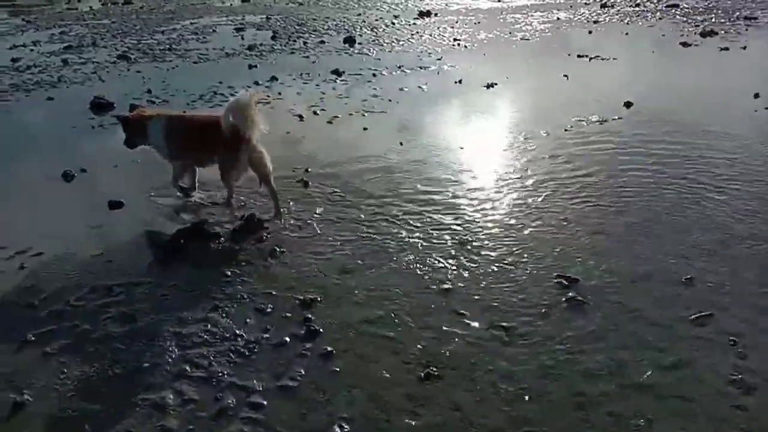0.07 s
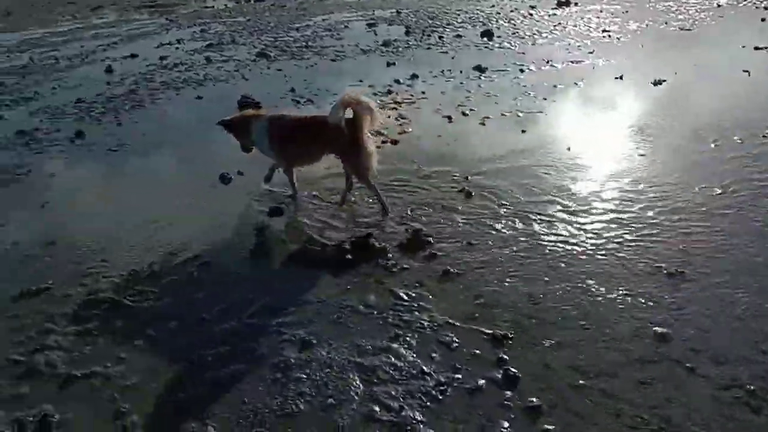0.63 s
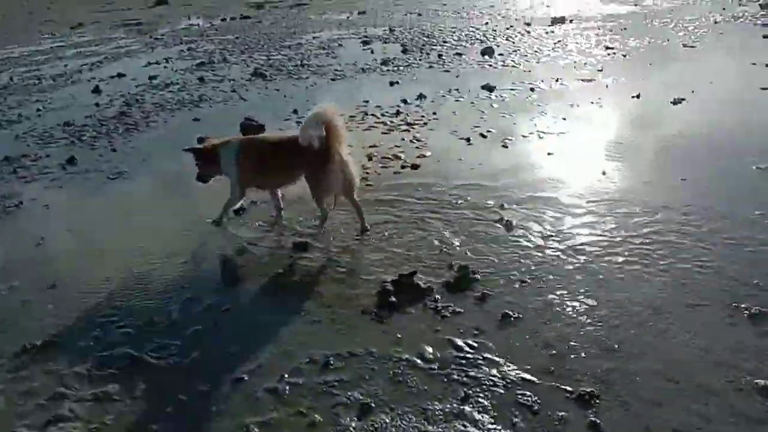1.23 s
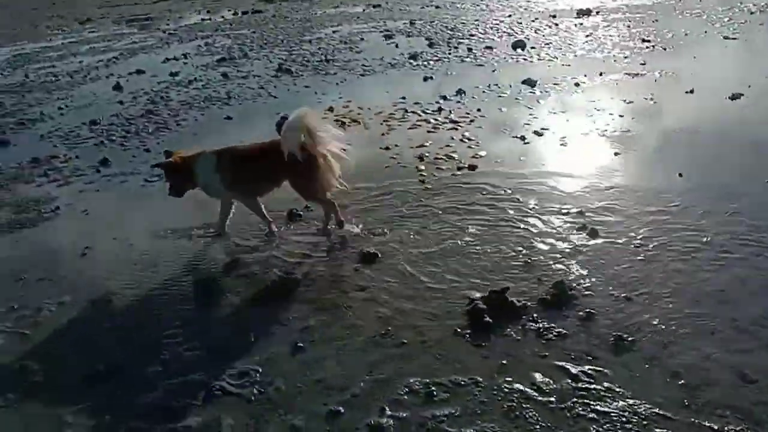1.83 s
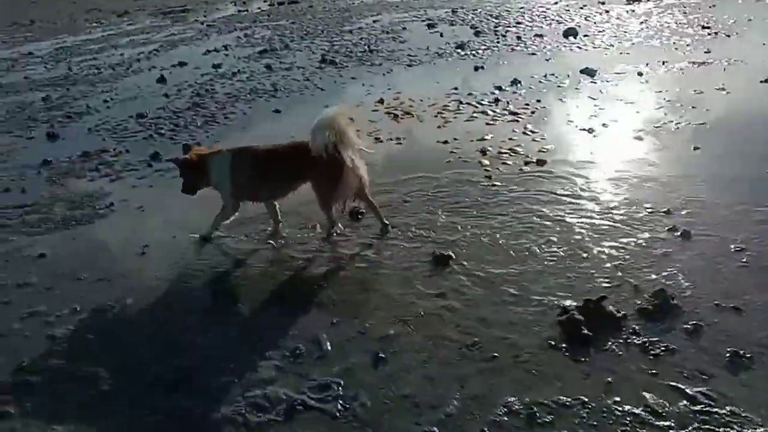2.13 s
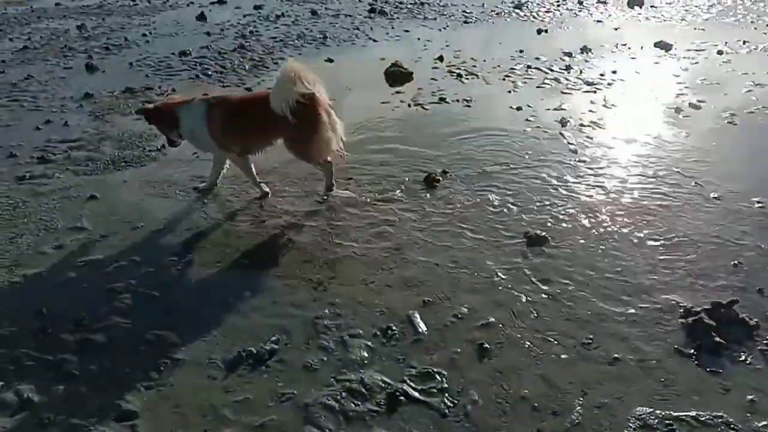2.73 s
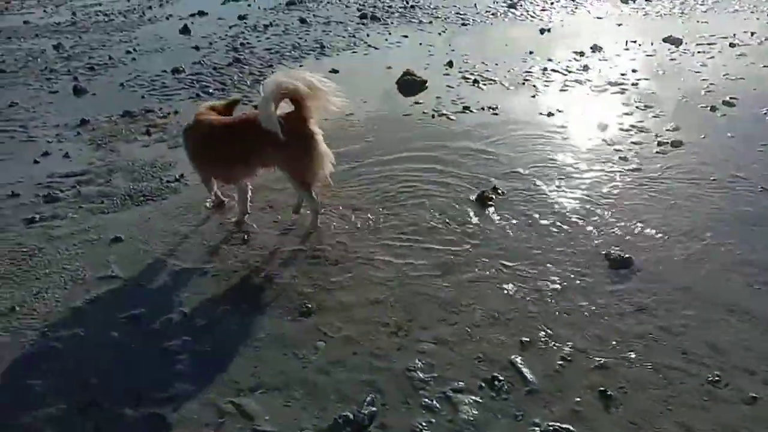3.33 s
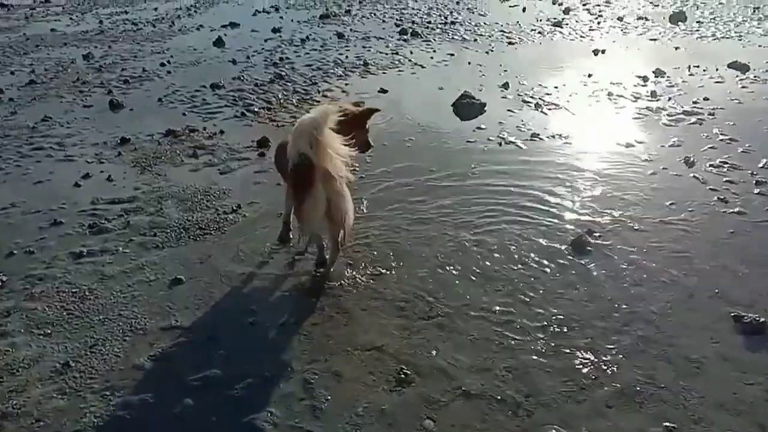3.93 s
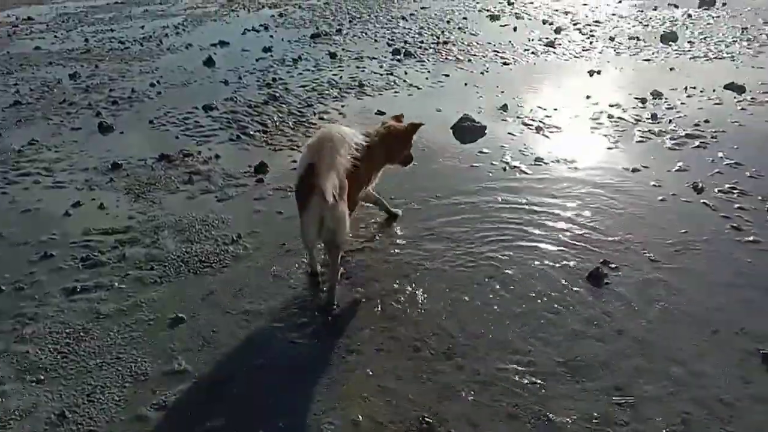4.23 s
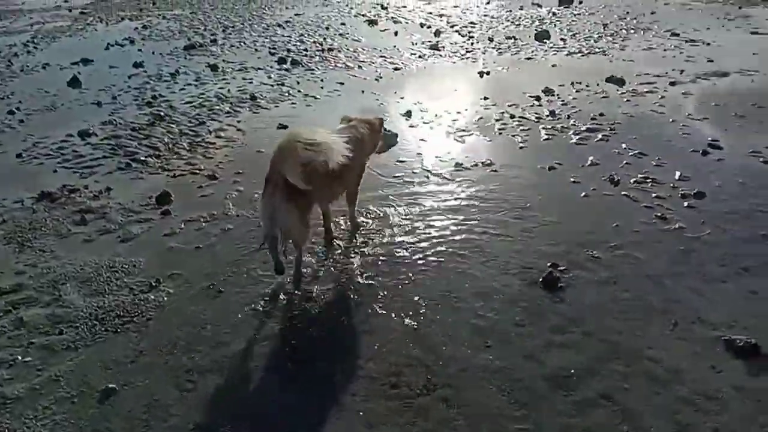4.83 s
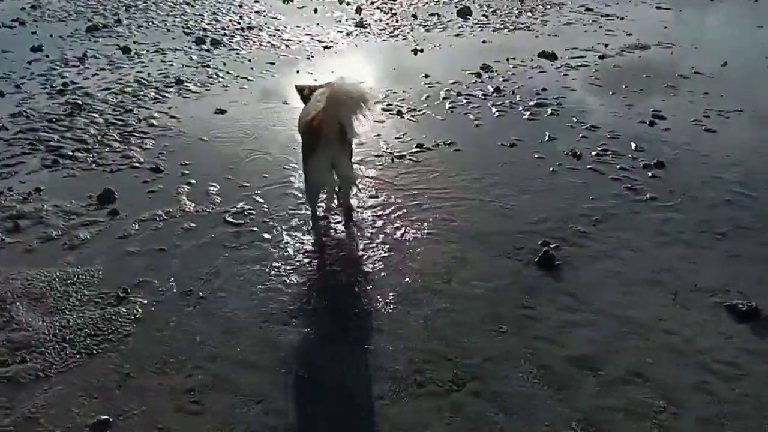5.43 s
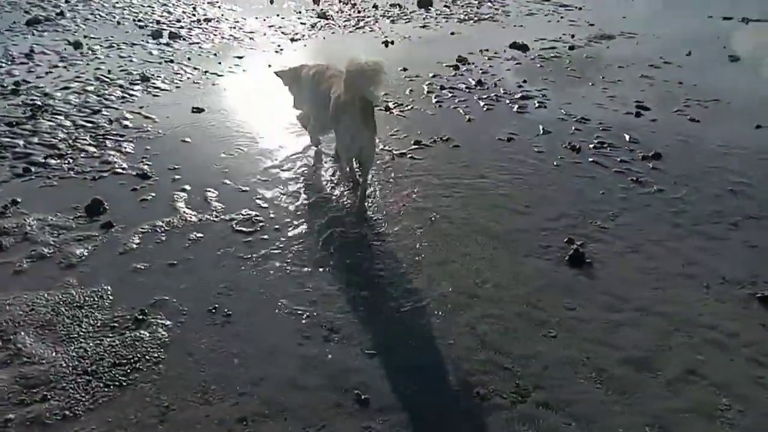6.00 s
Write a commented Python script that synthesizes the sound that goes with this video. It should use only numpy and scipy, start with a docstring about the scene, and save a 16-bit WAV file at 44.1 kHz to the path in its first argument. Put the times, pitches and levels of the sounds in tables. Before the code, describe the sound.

Gusty wind rumbles on the microphone, growing louder and steadier halfway, as a wading dog's small splashes and drips become fainter.

```python
"""A dog wades through a film of water on a tidal flat. From the start its paws slap, squelch and drag
up spray, leaving drips and ringing bubbles, while wind hits the microphone in separate puffs.
After a lull, one paw traps a big bubble that plops near 3 s. The wind then swells twice into a steady
rumble, held down by a limiter, and the steps grow fainter.
A faint hiss with one narrow resonance lies under it all."""
import sys
import numpy as np
from scipy import signal
from scipy.fft import rfft, irfft, next_fast_len
from scipy.io import wavfile
from scipy.ndimage import uniform_filter1d, minimum_filter1d, map_coordinates

SR = 44100
rng = np.random.default_rng(int(sys.argv[2]) if len(sys.argv) > 2 else 0)


def transcribe(u):
    """Save the signal u as a 16-bit wav file named by the first command-line argument.

    u: samples, shape (n,) or (channels, n), limited to [-1, 1]; the rate is SR.
    q: integer samples, one column per channel.
    """
    v = np.clip(np.atleast_2d(u).T, -1, 1)
    q = np.round(v * 32767).astype(np.int16)
    wavfile.write(sys.argv[1], SR, q)


N = 267466


def amp(db):
    return 10 ** (np.asarray(db) / 20)


def unit_rms(x):
    return x / np.sqrt(np.mean(x ** 2) + 1e-20)


def noise(size):
    return rng.standard_normal(size)


def wobble(rate_hz):
    """Smooth random curve, rate_hz knots a second."""
    return map_coordinates(noise(N // 20), [np.arange(N) * rate_hz / SR], mode="wrap")


def filtered(x, response):
    """Zero-phase filter with gain response(hz)."""
    size = next_fast_len(N + 8192)
    return irfft(rfft(x, size) * response(np.fft.rfftfreq(size, 1 / SR)), size)[:N]


def coloured(x, spectrum):
    """Shape x by (frequency [Hz], gain [dB]) points; rms 1."""
    knots_hz, db = np.transpose(spectrum)
    return unit_rms(filtered(x, lambda hz: amp(np.interp(np.log(hz + 1), np.log(knots_hz), db))))


def even(x, window_s):
    """Level out swells slower than window_s."""
    size = max(3, int(window_s * SR))
    power = uniform_filter1d(uniform_filter1d(x * x, size), size)
    return x / np.sqrt(np.abs(power) + 1e-6)


def band(x, lo_hz, hi_hz):
    edges_hz = [lo_hz, min(hi_hz, .49 * SR)]
    return signal.sosfilt(signal.butter(2, edges_hz, "band", fs=SR, output="sos"), x)


def add(track, start_s, sound):
    part = track[max(0, round(start_s * SR)):][:len(sound)]
    part += sound[:len(part)]


def bubble(t, hz, cycles, rise):
    """Damped ring, down to 1/e after cycles; the pitch climbs as the bubble nears the surface."""
    age = t * hz / cycles
    return np.sin(2 * np.pi * hz * t * (1 + rise * age / 2)) * np.exp(-age) * (1 - np.exp(-t * hz))


def bubble_cloud(count, lo_hz, hi_hz, cycles, rise, spread_db, samples):
    """Small bubbles of random time, pitch, life and strength."""
    when, pitch, life, strength = rng.random((count, 4)).T[:, :, None]
    k = np.arange(samples)
    rings = bubble(k / SR, lo_hz * (hi_hz / lo_hz) ** pitch, cycles * (.5 + life), rise)
    rings *= amp(-spread_db * np.log(1 - .99 * strength))
    positions = (when * N).astype(int) + k
    return np.bincount(positions.ravel(), rings.ravel(), N)[:N]


def leg_push(age_s, length_s, attack_s=0.012, sag_db_per_s=30, release_db_per_s=329.5):
    """A leg's push builds fast and sags; then the water settles."""
    fall_db = sag_db_per_s * np.maximum(age_s, 0) + release_db_per_s * np.maximum(age_s - length_s, 0)
    return np.clip(age_s / attack_s + .5, 0, 1) * amp(-fall_db)


# Legs sweeping through water: (start [s], length [s], slosh [dB], spray [dB])
LEG_SWEEPS = [(0, 0.048, -46.5, -54), (0.169, 0.044, -56, -64), (0.248, 0.016, -44.5, -51),
              (0.3, 0.11, -49.5, -55.5), (0.486, 0.06, -56, -64.5), (0.892, 0.027, -57.5, -50.5),
              (0.968, 0.15, -67.5, -72.5), (1.134, 0.057, -54, -62.5), (1.203, 0.06, -51.5, -52),
              (1.325, 0.012, -59.5, -61.5), (1.487, 0.11, -62, -69.5), (1.591, 0.077, -57.5, -56.5),
              (1.643, 0.032, -50, -50), (1.676, 0.075, -50, -54), (1.937, 0.2, -52, -58),
              (2.14, 0.26, -65, -89), (2.321, 0.18, -53.5, -67.5), (2.524, 0.061, -61, -58),
              (2.569, 0.13, -52, -57), (2.795, 0.24, -58.5, -61.5), (2.95, 0.087, -52, -53.5),
              (3.25, 0.011, -58.5, -58.5), (3.38, 0.12, -52.5, -58), (3.67, 0.042, -59.5, -67),
              (3.771, 0.0067, -64, -61.5), (4.059, 0.012, -64.5, -72), (4.384, 0.046, -52.5, -61),
              (4.445, 0.037, -57, -62), (4.529, 0.07, -59.5, -65), (4.645, .025, -67, -67.5),
              (4.698, 0.0092, -65, -66.5), (4.731, 0.016, -62.5, -70.5), (4.923, 0.11, -69.5, -83),
              (5.19, 0.0099, -76.5, -60.5), (5.318, 0.056, -61, -68.5), (5.63, 0.031, -60, -64),
              (5.935, 0.0052, -83, -65.5)]
# Churned water, spray, settling water: (frequency [Hz], gain [dB])
CHURN_SPECTRUM = [(400, -16.5), (800, -24), (1300, 3), (1600, -1.5), (2000, 1.5), (2600, 1.5), (3500, 5),
                  (4700, -3), (6000, -3), (9000, -40)]
SPRAY_SPECTRUM = [(2500, -15.5), (4000, -12.5), (5200, -2), (6000, -19.5), (7000, -6), (9300, -1),
                  (11500, -10.5), (13700, -13), (15000, -13), (16000, 7.5)]
WASH_SPECTRUM = [(350, -13), (600, 0.5), (1000, -0.5), (1800, 0), (3000, -9.5), (5000, -23.5)]


def wading(trickle_db=-69, fade_db_per_s=1.24, clump_db=2.0, wash_db=-10, settle_s=0.13):
    """Legs churn a crackling slosh and throw spray that spatters and drips; a dull wash lingers."""
    t = np.arange(N) / SR
    slosh = amp(trickle_db - fade_db_per_s * t)  # run-off from the legs, fading as the dog walks on
    spray = slosh * amp(-12)
    for start_s, length_s, slosh_db, spray_db in LEG_SWEEPS:
        push = leg_push(t - start_s, length_s)
        slosh = np.hypot(slosh, amp(slosh_db) * push)
        spray = np.hypot(spray, amp(spray_db) * push)
    churn = bubble_cloud(11000, 900, 6500, cycles=3.2, rise=.002, spread_db=3.9, samples=450)
    drops = bubble_cloud(10000, 4000, 16000, cycles=3.6, rise=.002, spread_db=4.4, samples=200)
    clicks = bubble_cloud(1700, 2500, 9000, cycles=.5, rise=0, spread_db=4.5, samples=100)
    plinks = bubble_cloud(700, 2400, 9500, cycles=14, rise=.003, spread_db=3, samples=1500)
    churn = even(coloured(unit_rms(churn) + 0.65 * noise(N), CHURN_SPECTRUM), window_s=.05)
    drops = even(coloured(unit_rms(drops) + 0.16 * noise(N), SPRAY_SPECTRUM), window_s=.07)
    crackle = amp(-12) * even(unit_rms(band(clicks, 1600, 5000)), window_s=.06)
    spatter = amp(-11) * even(unit_rms(band(clicks, 6000, 11500)), window_s=.06)
    clumps = amp(clump_db * wobble(110))  # water falls back in clumps
    pole = np.exp(-1 / (settle_s * SR))
    stirred = signal.lfilter([1 - pole], [1, -pole], slosh)
    wash = amp(wash_db) * stirred * coloured(noise(N), WASH_SPECTRUM)
    drips = np.minimum(slosh * amp(-9), amp(-62)) * unit_rms(plinks)
    return clumps * (slosh * churn + spray * drops + wash) + slosh * crackle + spray * spatter + drips


# Impacts on water, broad paws low, small drops high: (time [s], level [dB], pitch [Hz])
IMPACTS = [(0.026, -20.5, 1750), (0.2512, -18, 1300), (0.26, -23, 1940), (0.263, -16, 2700),
           (0.2705, -26.5, 4140), (0.346, -27.5, 3660), (0.409, -11.5, 3100), (0.4563, -34, 3870),
           (0.725, -25, 3370), (0.735, -27.5, 5100), (0.853, -27.5, 2220), (0.8978, -27, 4740),
           (0.9, -29, 3800), (1.1264, -33, 4300), (1.1511, -23.5, 1950), (1.204, -11.5, 1590),
           (1.2165, -5, 2070), (1.241, -18.5, 2940), (1.3342, -26.5, 12000), (1.5485, -26.5, 2030),
           (1.5726, -33, 4860), (1.608, -36.5, 2380), (1.66, -15.5, 3460), (1.6658, -32, 4570),
           (1.684, -39, 3200), (1.9704, -28, 3400), (2.034, -13.5, 1750), (2.0598, -26, 3650),
           (2.069, -37, 5200), (2.1596, -31, 5160), (2.3355, -27, 5740), (2.5235, -34.5, 3900),
           (2.5931, -39, 2520), (2.683, -25.5, 4150), (2.7176, -44, 2600), (2.8134, -37, 5070),
           (2.8514, -40, 6000), (2.905, -29.5, 4830), (2.969, -18.5, 2250), (2.9824, -13.5, 1740),
           (3.0662, -13.5, 2580), (3.086, -30.5, 3280), (3.1997, -37, 7000), (3.3967, -17.5, 2750),
           (3.4138, -27.5, 3340), (3.512, -20, 2883), (3.5165, -14.5, 3550), (3.711, -38.5, 5600),
           (4.241, -19, 3200), (4.3893, -28.5, 3150), (4.4574, -33.5, 3710), (4.4815, -22, 3940),
           (4.538, -32, 1300), (4.645, -36, 1800), (4.741, -38, 4000), (4.9285, -30, 1480),
           (5.0403, -34, 5040), (5.1954, -32, 3240), (5.6396, -27.5, 3270), (5.6617, -33, 2450),
           (5.938, -33.5, 5000)]
# Hollow knock, wet splat, sharp tick: (frequency [Hz], gain [dB], life [cycles])
IMPACT_MODES = [(1150, -2, 1.33), (2820, -2, 0.97), (8750, 3.5, 2.83)]


def slaps(fall_db_per_octave=15, patter_db=-25, patter_t60_s=0.041):
    """An impact rings three modes, less so far from its pitch, each with a short patter behind."""
    out, t = np.zeros(N), np.arange(SR // 12) / SR
    mode_hz, mode_db, mode_cycles = np.transpose(IMPACT_MODES)
    patter_decay = amp(patter_db - 60 * t / patter_t60_s)
    for time_s, db, pitch_hz in IMPACTS:
        detune = np.exp(rng.normal(0, 0.19))
        octaves = np.abs(np.log2(mode_hz / pitch_hz))
        gains = amp(db + mode_db - fall_db_per_octave * (octaves - octaves.min()))
        for gain, hz, cycles in zip(gains, mode_hz * detune, mode_cycles):
            patter = unit_rms(band(noise(len(t)), hz / np.sqrt(2), hz * np.sqrt(2)))
            add(out, time_s, gain * (bubble(t, hz, cycles, rise=0) + patter * patter_decay))
    return out


# Air pockets closing behind a paw, and bright drips: (time [s], level [dB], pitch [Hz])
SINGLE_BUBBLES = [(0.024, -30, 1910), (0.242, -34.5, 1800), (0.2543, -24, 1280), (0.276, -44, 2850),
                  (0.309, -35, 3420), (.319, -39, 1990), (0.329, -39, 2650), (.358, -41, 1810),
                  (0.368, -37, 2540), (0.387, -29.5, 2130), (0.409, -27, 1760), (0.514, -38.5, 4050),
                  (.569, -47, 4530), (.611, -56, 6050), (.852, -41.5, 4900), (.997, -46, 2830),
                  (1.057, -43.5, 2480), (1.166, -36, 2770), (1.18, -38, 2520), (1.201, -27, 2000),
                  (1.2036, -16, 1284), (1.215, -19, 1300), (1.227, -45, 3530), (1.242, -34, 1980),
                  (1.2767, -32, 2100), (1.307, -31, 2000), (1.319, -31, 1280), (1.322, -32.5, 3000),
                  (1.4221, -38, 2560), (1.605, -35.5, 2970), (1.662, -34, 3820), (1.683, -31.5, 3220),
                  (1.698, -29.5, 1980), (1.741, -45, 1690), (1.743, -37, 2890), (1.759, -40, 2000),
                  (1.8318, -32, 1270), (1.998, -40, 1880), (2.0346, -25.5, 1330), (2.107, -37, 1910),
                  (2.151, -35, 2240), (2.26, -45, 2800), (2.356, -40, 2840), (2.364, -38, 3420),
                  (2.414, -40.5, 2150), (2.576, -44, 1870), (2.578, -41, 3330), (2.594, -37, 2600),
                  (2.66, -42, 3880), (2.675, -36, 3860), (2.788, -44, 4100), (2.796, -39.5, 2430),
                  (2.9304, -37, 2090), (2.942, -33, 2600), (2.9538, -29, 1340), (3.261, -35.5, 2130),
                  (3.368, -45, 2730), (3.4, -32, 3430), (3.411, -32.5, 3170), (3.455, -40, 3380),
                  (3.49, -46, 2120), (3.663, -42, 2140), (3.683, -26.5, 1247), (3.785, -39.5, 2950),
                  (3.939, -56, 3840), (4.057, -46, 2650), (4.067, -44.5, 2610), (4.081, -49.5, 4540),
                  (4.162, -51, 3740), (4.2381, -41, 3000), (4.283, -48.5, 3560), (4.307, -51, 3450),
                  (4.385, -34, 3520), (4.399, -36, 3900), (4.413, -39, 3270), (4.428, -41, 1760),
                  (4.508, -45, 2690), (4.5369, -27.5, 1140), (4.578, -44, 2800), (4.588, -42, 2750),
                  (4.598, -43, 2880), (4.645, -39, 1350), (4.693, -45.5, 3700), (4.744, -42, 3660),
                  (4.7593, -45, 3620), (4.927, -26.5, 1120), (4.957, -39, 1120), (5.191, -40.5, 2520),
                  (5.63, -43.5, 2020), (5.66, -38.5, 1880), (5.661, -38, 3370), (5.715, -48.5, 3630),
                  (5.876, -53.5, 3700), (6.0047, -43.5, 2320)]


def bubbles(jostle_depth=0.13, ref_cycles=4.93, ref_hz=1260):
    """Bubbles ring and glide slightly, jostled by moving water; small ones last more cycles."""
    out, t = np.zeros(N), np.arange(SR // 20) / SR
    for time_s, db, hz in SINGLE_BUBBLES:
        jostle = 1 + jostle_depth * unit_rms(band(noise(len(t)), 150, 900))
        ring = bubble(t, hz, ref_cycles * np.sqrt(hz / ref_hz), rise=rng.normal(0.0029, 0.0033))
        add(out, time_s, amp(db) * jostle * ring)
    return out


def plop(start_s=2.982, start_hz=735, db=-20, climb_s=0.048, t60_s=0.125, burst_s=0.069):
    """A paw traps a big bubble; its note swoops up, quivering, until it bursts."""
    out, t = np.zeros(N), np.arange(SR // 10) / SR
    quiver = wobble(260)[:len(t)] * t / climb_s
    pitch_hz = start_hz * (1 + 0.53 * (t / climb_s) ** 2 + 0.061 * quiver)
    ring = np.sin(2 * np.pi * np.cumsum(pitch_hz) / SR)
    attack = 1 - np.exp(-t / 0.00026)
    decay = amp(-60 * t / t60_s + 3.5 * quiver)
    cutoff = np.clip((burst_s - t) / .006, 0, 1)
    add(out, start_s, amp(db) * ring * attack * decay * cutoff)
    return out


# Paws pressing into mud: (time [s], level [dB], t60 [s])
PAW_PRESSES = [(0.248, -32.5, 0.1), (0.324, -37.5, 0.055), (0.823, -50.5, 0.41), (1.202, -38, 0.25),
               (1.964, -50, 1), (2.034, -64, 0.2), (2.419, -46, 0.24), (2.59, -59, 0.23), (2.81, -45, 0.19),
               (3.195, -42, 0.16), (3.565, -45.5, 0.51), (4.541, -39, 0.091), (4.927, -37, 0.064),
               (4.956, -54.5, 0.98), (5.311, -37, 0.09)]
# Mud gurgle: (frequency [Hz], gain [dB])
GURGLE_SPECTRUM = [(350, -45.5), (700, -4.5), (1100, 5.5), (1350, 10), (1700, -40.5), (3500, -4),
                   (6000, -20)]


def squelches(attack_s=0.002):
    """Muddy water gurgles out from under a paw."""
    press, t = np.zeros(N), np.arange(SR // 4) / SR
    for time_s, db, t60_s in PAW_PRESSES:
        add(press, time_s, amp(db - 60 * t / t60_s) * (1 - np.exp(-t / attack_s)))
    gurgle = bubble_cloud(3000, 550, 3800, cycles=3, rise=.02, spread_db=3, samples=900)
    return press * even(coloured(gurgle, GURGLE_SPECTRUM), window_s=.012)


# Air pockets in trodden mud: (time [s], level [dB], first droplet pitch [Hz])
AIR_POCKETS = [(0.1887, -46, 4910), (0.2834, -47, 4020), (0.2993, -35, 4130), (0.3575, -38, 4560),
               (0.433, -37, 8800), (0.4907, -46, 4140), (0.598, -49, 5880), (0.9794, -49, 4000),
               (1.0228, -49, 5030), (1.0526, -57, 5500), (1.0858, -50, 5700), (1.0999, -50, 4100),
               (1.203, -26, 5090), (1.308, -52.5, 7770), (1.67, -32, 4870), (1.7232, -39, 8800),
               (1.737, -45, 8600), (1.9058, -52, 3920), (1.9465, -44.5, 4070), (2.4217, -45, 4480),
               (2.4852, -44, 4550), (2.5464, -45, 7500), (2.745, -47, 6760), (2.8798, -38.5, 4970),
               (2.9536, -32, 4050), (3.023, -37, 9500), (3.052, -42, 4420), (3.265, -44, 5530),
               (3.3237, -50, 4150), (3.5687, -47.5, 5460), (3.679, -48, 4770), (3.7828, -45, 7860),
               (3.816, -55.5, 4030), (4.097, -49.5, 4490), (4.34, -56, 4240), (4.5392, -45, 4800),
               (4.6357, -49.5, 5340), (4.6645, -51, 5330), (4.7067, -47, 4030), (5.1175, -54, 4090),
               (5.319, -48.5, 5660), (5.435, -49, 4050), (5.63, -43.5, 4790), (5.7144, -50, 5230)]


def mud_ticks(ring_db=-3.5, snap_db=-9, snap_t60_s=0.0054, fizz_db=-24, fizz_t60_s=0.04, top_hz=10500):
    """Each pocket snaps open and flicks out four tinkling droplets."""
    out, t = np.zeros(N), np.arange(SR // 25) / SR
    burst = amp(snap_db - 60 * t / snap_t60_s) + amp(fizz_db - 60 * t / fizz_t60_s)
    for time_s, db, first_hz in AIR_POCKETS:
        add(out, time_s, amp(db) * band(noise(len(t)) * burst, 3200, 11000))
        for k, (lag, height) in enumerate(rng.random((4, 2))):
            hz = first_hz * (top_hz / first_hz) ** height if k else first_hz
            droplet = bubble(t, hz, cycles=7.5, rise=.002)
            add(out, time_s + .002 * k * lag, amp(db + ring_db - 2 * k) * droplet)
    return out


# Breeze, lull, two hard swells: (time [s], rumble [dB], flutter [dB])
WIND_LEVELS = [(0, -31, -51.5), (2.15, -37.5, -66), (2.3, -42.5, -54), (2.58, -38.5, -59),
               (2.92, -37.5, -62), (3.1, -23.5, -33.5), (3.55, -20.5, -35), (3.68, -20, -27.5),
               (4.05, -21, -33.5), (4.45, -20.5, -40), (4.77, -23.5, -56), (4.89, -31.5, -78),
               (5.14, -23.5, -53), (5.305, -20.5, -30), (5.34, -19, -25), (5.66, -20, -27),
               (6.06, -23.5, -35.5)]
# Puffs on top: (crest time [s], length [s], rumble [dB], flutter [dB])
WIND_PUFFS = [(0.114, 0.058, -28, -28.5), (0.195, 0.15, -28.5, -29.5), (0.337, 0.062, -23, -35.5),
              (0.468, 0.039, -21, -29.5), (0.613, 0.049, -23.5, -29), (0.723, 0.0063, -22.5, -50),
              (0.822, 0.07, -37, -33), (0.967, 0.19, -28.5, -46.5), (1.191, 0.16, -29, -35),
              (1.266, 0.11, -25.5, -35.5), (1.453, 0.016, -18.5, -48), (1.54, 0.021, -32, -35),
              (1.628, 0.12, -33, -33), (1.81, 0.043, -29.5, -31.5), (1.894, 0.068, -25.5, -39),
              (1.974, 0.013, -39, -29), (2.059, 0.03, -27, -36), (2.154, 0.071, -30.5, -42),
              (2.73, 0.089, -31, -47.5), (2.818, 0.079, -28, -41.5), (2.992, 0.077, -22.5, -43.5),
              (3.222, 0.026, -34, -39.5), (3.43, 0.073, -24, -34.5), (3.805, 0.069, -20.5, -34),
              (4.159, 0.014, -16.5, -43), (4.422, 0.039, -30, -31), (4.636, 0.011, -21, -48.5),
              (4.74, 0.018, -20.5, -48), (5.004, 0.033, -21, -45.5), (5.23, 0.019, -22, -30.5),
              (5.35, 0.031, -29.5, -20.5), (5.702, 0.024, -25.5, -22), (5.778, .03, -24, -30.5),
              (5.866, 0.031, -37.5, -28.5), (5.937, 0.021, -25, -22)]
# Heavy rumble, fast flutter, rasp of the hardest gusts: (frequency [Hz], gain [dB])
RUMBLE_SPECTRUM = [(20, -28.5), (35, -13.5), (50, -17.5), (70, 2), (110, 4.5), (180, -0.5), (270, -10.5),
                   (380, -29), (600, -49.5), (1200, -100)]
FLUTTER_SPECTRUM = [(120, -18.5), (250, 14.5), (350, 9), (480, -1), (700, -25.5), (1000, -42.5),
                    (1500, -61.5), (3000, -82)]
RASP_SPECTRUM = [(300, -32), (550, 10), (800, -3.5), (1100, -16.5), (1500, -38), (2500, -66.5)]


def wind(rasp_db=-16, hard_gust_db=-27):
    """Turbulence rumbles at the microphone port; strong swirls flutter, brighter in hard gusts."""
    t = np.arange(N) / SR
    times_s, *levels_db = np.transpose(WIND_LEVELS)
    rumble_gain, flutter_gain = (amp(np.interp(t, times_s, db)) for db in levels_db)
    for crest_s, length_s, rumble_db, flutter_db in WIND_PUFFS:
        swell = np.exp(-2 * ((t - crest_s) / length_s) ** 2)
        rumble_gain = np.hypot(rumble_gain, amp(rumble_db) * swell)
        flutter_gain = np.hypot(flutter_gain, amp(flutter_db) * swell)
    flutter_gain *= amp(0.8 * wobble(14))
    rumble = even(coloured(noise(N), RUMBLE_SPECTRUM), window_s=.09)
    swirl = (1.3 + np.abs(signal.hilbert(rumble))) * amp(6.25 * wobble(70))
    flutter = even(coloured(noise(N), FLUTTER_SPECTRUM) * swirl, window_s=.078)
    rasp = even(coloured(noise(N), RASP_SPECTRUM) * swirl, window_s=.57)
    rasp *= amp(rasp_db) * flutter_gain / amp(hard_gust_db)
    return rumble_gain * rumble + flutter_gain * (flutter + rasp)


# Eddies striking the microphone: (time [s], push [dB], kink [dB])
EDDY_HITS = [(0.113, -11.5, -31), (0.123, -13, -39), (0.163, -20, -49), (0.23, -21, -50), (.584, -9.5, -38),
             (0.607, -23, -28.5), (.825, -13, -24), (1.249, -13, -27), (1.327, -12.5, -29.5),
             (1.445, -18, -43), (1.602, -14.5, -33), (1.614, -19, -26), (1.648, -19, -46),
             (1.801, -15.5, -21.5), (1.914, -17, -29), (1.978, -18, -45), (2.237, -20.5, -55),
             (2.787, -26, -54), (3.14, 2.5, -37), (3.216, -28, -25), (3.296, -7.5, -25), (3.57, -23, -40),
             (3.69, -15, -27), (3.749, -11.5, -25), (4.084, -18, -27.5), (5.334, -18.5, -19),
             (5.361, -19, -23), (5.387, -7, -19), (5.48, -10.5, -23), (5.5, -6, -14.5), (5.537, -9, -19),
             (5.547, -22, -17), (5.591, 3.5, -46), (5.625, -12.5, -12.5), (5.641, -7, -15.5),
             (5.689, -5, -18), (5.707, -9, -21), (5.859, -16.5, -25), (5.936, -16.5, -21.5),
             (5.957, -6, -15.5)]


def eddies(push_hz=140, kink_hz=380, brightening_per_db=0.013, ref_kink_db=-31):
    """An eddy is one pressure swing with a kink inside; stronger kinks are shorter."""
    out, t = np.zeros(N), np.arange(-SR // 50, SR // 50) / SR

    def swing(hz, cycles):
        return np.cos(2 * np.pi * hz * t + rng.normal(0, 0.59)) * np.exp(-(t * hz / cycles) ** 2)

    for time_s, push_db, kink_db in EDDY_HITS:
        push = swing(push_hz * np.exp(rng.normal(0, 0.15)), cycles=0.6)
        kink = swing(kink_hz * np.exp(brightening_per_db * (kink_db - ref_kink_db)), cycles=0.53)
        add(out, time_s + t[0], amp(push_db) * push + amp(kink_db) * kink)
    return out


# Faint hiss: (frequency [Hz], gain [dB])
HISS_SPECTRUM = [(940, -35), (1600, 5), (1790, 2), (2800, 0.5), (3420, -18), (3730, -2.5), (6850, -7.5),
                 (9100, -3.5), (12500, -12.5), (15500, -10)]


def background(ring_hz=1265, half_width_hz=65):
    """Even hiss, dull air noise and a narrow band that sings and wavers."""
    hiss = coloured(noise(N), HISS_SPECTRUM)
    air = coloured(noise(N), [(100, -1), (500, 6), (1100, -4.5), (1800, -54), (4000, -37.5)])
    ring = unit_rms(filtered(noise(N), lambda hz: 1 / (1 + ((hz - ring_hz) / half_width_hz) ** 2)))
    ring *= amp(1.3 * wobble(8))
    return amp(-76) * hiss + amp(-64.5) * air + amp(-63.5) * ring


def scene():
    """Paws in the water, under the wind; mono."""
    water = wading() + squelches() + slaps() + mud_ticks() + bubbles() + plop()
    return (water + wind() + eddies() + background())[None]


def record(dry, ceiling_db=-11.5, low_cut_hz=42, top_hz=15830):
    """A fast limiter holds the wind down; deep bass and top treble are cut."""
    def passband(hz):
        return hz ** 2 / np.hypot(hz ** 2, low_cut_hz ** 2) * (hz < top_hz)

    mono = dry[0]
    needed_gain = np.minimum(1, amp(ceiling_db) / (np.abs(mono) + 1e-9))
    held_gain = minimum_filter1d(needed_gain, size=400)
    gain = uniform_filter1d(uniform_filter1d(held_gain, size=200), size=200)
    return filtered(mono * gain, passband)[None]


dry = scene()
out = record(dry)
transcribe(out)
```